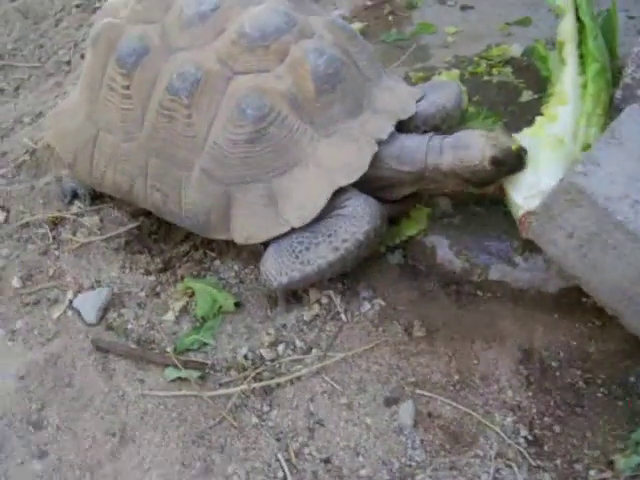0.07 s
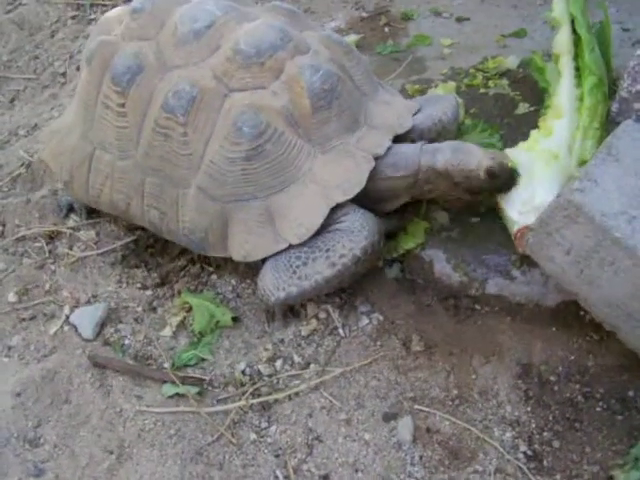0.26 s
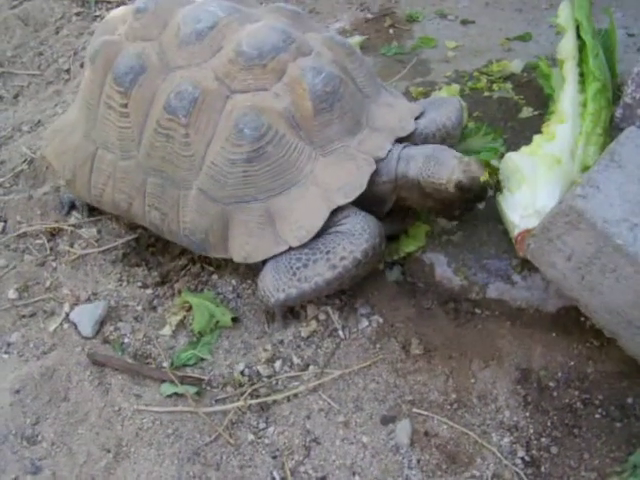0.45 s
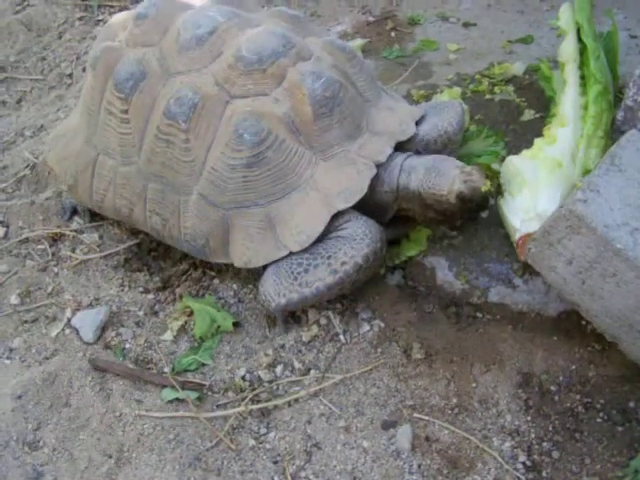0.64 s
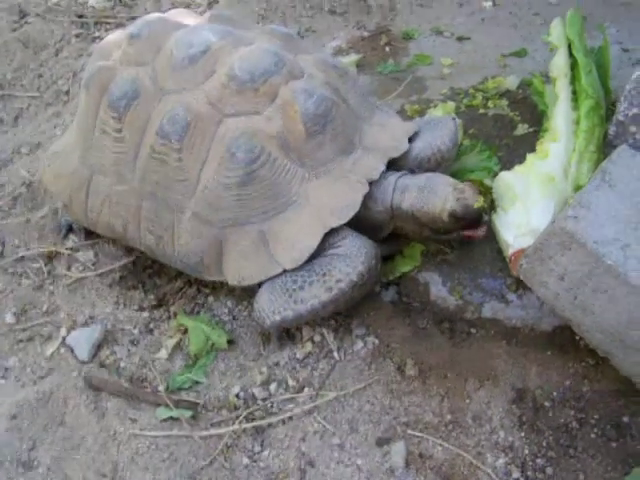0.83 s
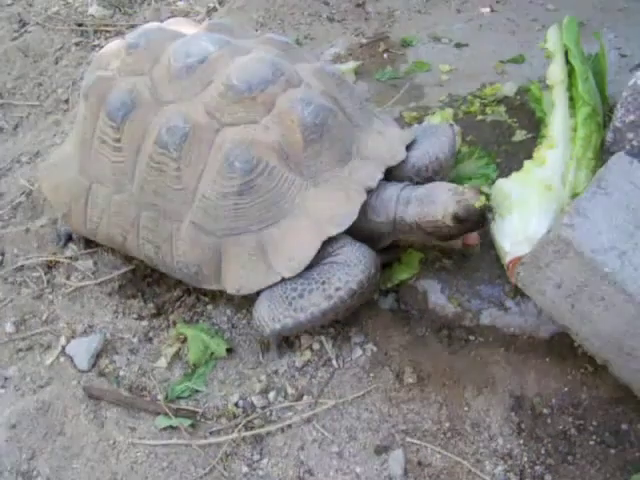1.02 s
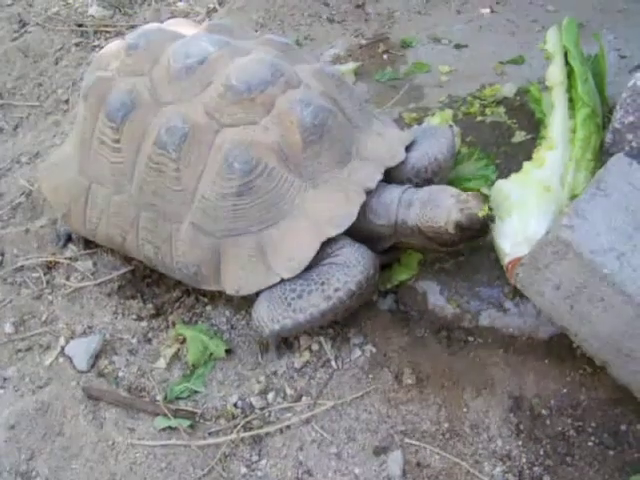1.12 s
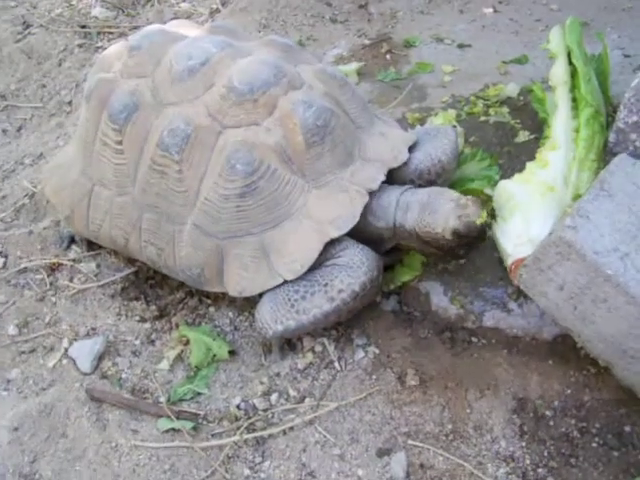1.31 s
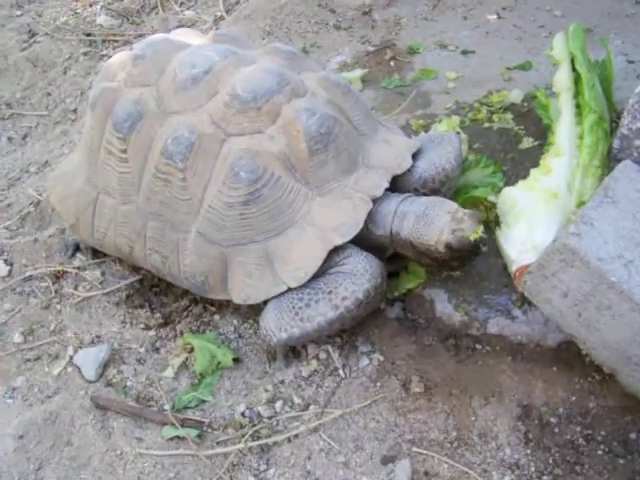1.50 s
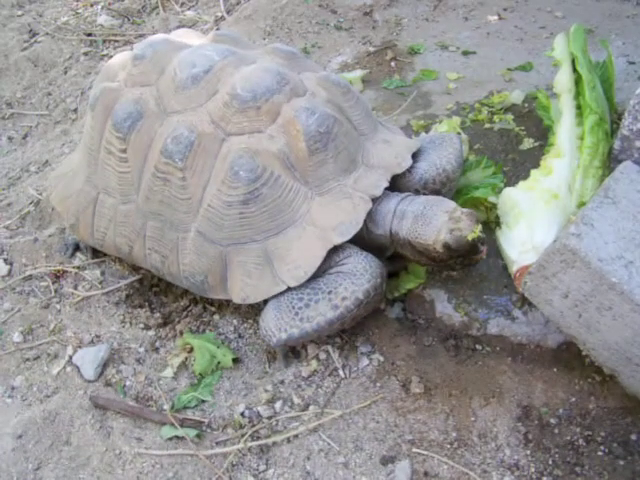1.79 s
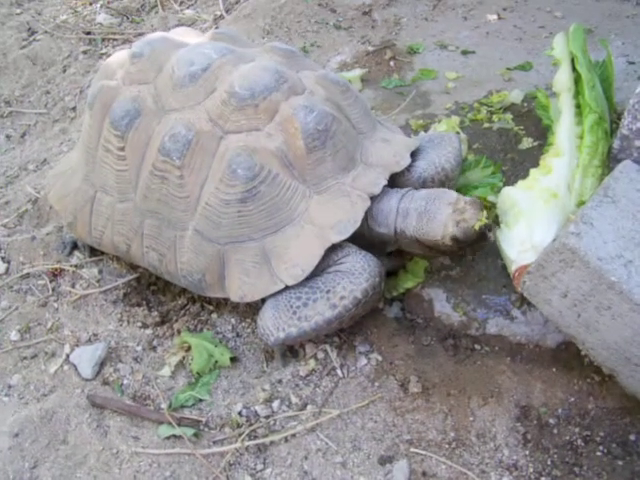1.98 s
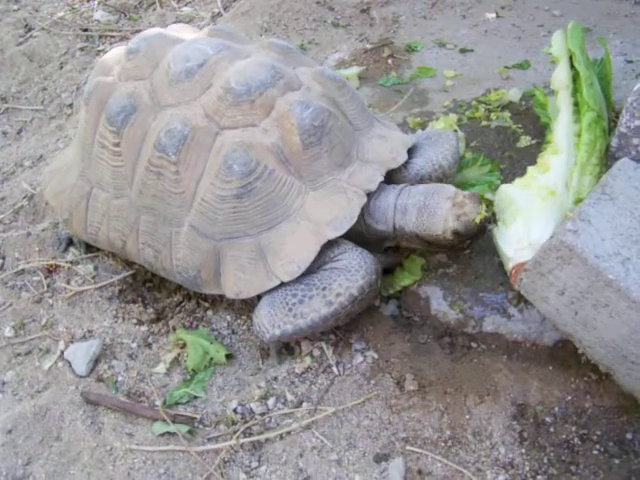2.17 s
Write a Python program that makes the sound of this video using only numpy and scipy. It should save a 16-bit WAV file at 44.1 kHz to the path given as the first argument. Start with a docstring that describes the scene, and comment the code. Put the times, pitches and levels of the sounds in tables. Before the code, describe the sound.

A tortoise bites crisply into lettuce close by, then chews softly while a bird chirps.

```python
"""A low rumble, soft hiss and faint hum open in a quiet yard, under a blur of distant birds.
Close by, a tortoise tears a bite from a head of lettuce: leaf ribs snap one by one as noise bursts
in a leaf-coloured filter, over a crackle of random cell bursts. A near bird chirps three times with
two gliding voices at once; short gliding sines are distant birds and, from about 1.88 s, likely
echoes of the near chirp. Soft chewing follows the bite, as wet ticks and ringing pops of the mouth."""
import sys
import numpy as np
from scipy import signal
from scipy.fft import rfft, irfft
from scipy.io import wavfile
from scipy.ndimage import uniform_filter1d

SR = 44100
rng = np.random.default_rng(int(sys.argv[2]) if len(sys.argv) > 2 else 0)


def wav_record(signal):
    """Record a signal, one row per channel, as 16-bit PCM in the file named by sys.argv[1]."""
    frames = np.transpose(np.atleast_2d(signal))
    bounded = np.clip(frames, -1, 1)
    # unit amplitude maps onto the largest positive 16-bit level
    quanta = np.round(bounded * 32767).astype(np.int16)
    wavfile.write(sys.argv[1], SR, quanta)


N = 96799
T = np.arange(N) / SR


def amp(db):
    """Decibels to gain."""
    return 10 ** (np.asarray(db) / 20)


def unit(x):
    """Scales to rms 1."""
    return x / np.sqrt(np.mean(x ** 2) + 1e-20)


def read(points, hz):
    """A spectrum's dB at given frequencies, interpolated along log frequency."""
    point_hz, db = np.transpose(points)
    return np.interp(np.log(hz + 1), np.log(point_hz), db)


def add(mix, start_s, sound):
    """Mixes a sound in at a time."""
    part = mix[max(round(start_s * SR), 0):][:len(sound)]
    part += sound[:len(part)]


def drift(hz, size):
    """Smooth random motion with a soft upper rate, scaled to rms 1 over the whole scene."""
    f = np.fft.rfftfreq(N, 1 / SR)
    smooth = irfft(rfft(rng.standard_normal(N)) * np.exp(-(f / hz) ** 2), N)
    return unit(smooth)[:size]


def patchy(points, patch_db):
    """Noise of a given colour that swells in small patches of time and pitch; rms 1."""
    hz, _, z = signal.stft(rng.standard_normal(N), SR, nperseg=2048, noverlap=1536)
    patches = uniform_filter1d(rng.standard_normal(z.shape), size=16, axis=0)  # across pitch
    patches = unit(uniform_filter1d(patches, size=6, axis=1))  # across time
    z = z * amp(read(points, hz)[:, None] + patch_db * patches)
    return unit(signal.istft(z, nperseg=2048, noverlap=1536)[1][:N])


# open air around the yard, colour before overall scaling: (frequency [Hz], level [dB])
AIR_COLOUR = [(20, -8.5), (60, -0.5), (87, -11), (115, -1), (150, -11), (216, -11), (280, -19.5),
              (560, -21), (900, -19), (1720, -21.5), (2450, -27.5), (3300, -19.5), (4400, -26), (5400, -35),
              (7900, -38), (8800, -55.5)]
AIR_DB, AIR_PATCH_DB = -45, 0.83
# blur of distant birds, colour before overall scaling: (frequency [Hz], level [dB])
CHORUS_COLOUR = [(2400, -39), (2800, -3), (3500, 0.5), (4500, -3), (5300, -25.5), (7000, -59.5)]
CHORUS_DB, CHORUS_PATCH_DB = -57, 9
# faint hum: (mean frequency [Hz], rms level [dB])
HUM_TONES = [(59.5, -54), (118, -54)]
HUM_WAVER, HUM_WAVER_HZ = 0.027, 9.1  # rms fraction of pitch, soft upper rate
HUM_SWELL, HUM_SWELL_HZ = 0.31, 1.3  # rms fraction of loudness, soft upper rate


def background():
    """Coloured noise makes rumble, hiss and distant birds; sines of drifting pitch make the hum."""
    hum = np.zeros(N)
    for hz, db in HUM_TONES:
        swell = 1 + HUM_SWELL * drift(HUM_SWELL_HZ, N)
        cycles = hz * np.cumsum(1 + HUM_WAVER * drift(HUM_WAVER_HZ, N)) / SR
        hum += amp(db) * unit(swell * np.sin(2 * np.pi * cycles))
    air = amp(AIR_DB) * patchy(AIR_COLOUR, AIR_PATCH_DB)
    chorus = amp(CHORUS_DB) * patchy(CHORUS_COLOUR, CHORUS_PATCH_DB)
    return air + chorus + hum


PEAK_OCTAVES, PEAK_DB = 0.7, 8.5  # bump around a break's brightest pitch: width, height


def ring(points, centre_hz=None, size=1024):
    """Minimum-phase response of energy 1 with a given colour, lifted near an optional pitch."""
    hz = np.fft.rfftfreq(size, 1 / SR)
    db = read(points, hz)
    if centre_hz:
        octaves = np.log2((hz + 1) / centre_hz)
        db = db + PEAK_DB * np.exp(-(octaves / PEAK_OCTAVES * 2) ** 2)
    log_gain = np.log(amp(np.r_[db, db[-2:0:-1]]))
    # the Hilbert transform of the log gain gives the phase that puts the energy earliest
    h = np.fft.ifft(np.exp(np.conj(signal.hilbert(log_gain)))).real[:size // 2]
    return h / np.linalg.norm(h)


# colour of breaking leaf, shared by crackle and snaps: (frequency [Hz], level [dB])
LEAF_COLOUR = [(300, -32), (1000, -12), (2100, -9.5), (2950, 2.5), (3600, -4), (4200, 1.5), (4850, -5.5),
               (5450, -1), (6200, -9), (7600, -11.5), (9000, -28.5)]
# crackle at the mouth, following the force of the bite: (time [s], rms level [dB])
BITE_FORCE = [(.12, -54), (.16, -42.5), (.205, -34), (.25, -38), (.306, -37), (0.328, -29), (0.348, -42.5),
              (.386, -44.5), (.401, -32.5), (0.45, -38.5), (0.454, -60.5)]
CELLS_PER_S, CELL_HZ = 1300, 3900  # mean rate of bursts, pitch they are brightest near
CELL_SPREAD_DB, CELL_LARGEST_DB = 7, 9  # mean of the random sizes before the cap, cap


def crackle():
    """Tiny cells burst at random while the beak presses, each exciting the leaf."""
    size_db = np.minimum(CELL_SPREAD_DB * rng.exponential(1, N), CELL_LARGEST_DB)
    sizes = amp(size_db) * rng.choice([-1, 1], N)
    bursts = sizes * (rng.random(N) < CELLS_PER_S / SR)
    cells = signal.fftconvolve(bursts, ring(LEAF_COLOUR, CELL_HZ))[:N]
    time_s, db = np.transpose(BITE_FORCE)
    return unit(cells) * amp(np.interp(T, time_s, db, right=-120))


SPLINTER = 0.2  # splinter strength relative to the first break


def fracture(body, decay_s, size=700):
    """One break and its quickly dying splinters, heard through a body; energy 1."""
    burst = SPLINTER * rng.standard_normal(size) * np.exp(-np.arange(size) / SR / decay_s)
    burst[0] = 1
    sound = np.convolve(burst, body)
    return sound / np.linalg.norm(sound)


# colour of the beak's thud: (frequency [Hz], level [dB])
BEAK_COLOUR = [(150, -29.5), (380, -14.5), (560, -3.5), (850, 2.5), (1150, 0.5), (1700, -17), (2500, -22),
               (5000, -45)]
CRACK_GAIN_DB, CRACK_DECAY_S = 8.5, 0.0015
THUD_GAIN_DB, THUD_DECAY_S = 9.5, 0.0017
# leaf ribs snapping close by; levels are before the crack and thud gains above:
# (time [s], level [dB], brightest pitch [Hz], thud of the beak [dB re that level])
RIB_SNAPS = [(.1388, -20, 4660, -23), (.1417, -22, 3040, -22), (.149, -28, 5600, -11),
             (.1615, -32.5, 4180, -18), (.1725, -19.5, 5400, -27.5), (.1775, -23.5, 6500, -20),
             (.1877, -22.5, 4800, -19.5), (.1948, -16, 3800, -27.5), (.2021, -23, 5800, -23.5),
             (.205, -11, 4810, -20.5), (.209, -13.5, 3120, -25), (.2135, -17.5, 4030, -25.5),
             (.222, -19.5, 4774, -22.5), (.2273, -21.5, 4815, -32), (.2308, -21.5, 3920, -32.5),
             (.238, -23, 4460, -22), (.243, -20, 3780, -23), (.2575, -8.5, 4190, -24),
             (.2868, -13.5, 5300, -22), (.3075, -22.5, 5480, -24.5), (.3202, -24.5, 4035, -19),
             (.3268, -18, 4600, -21), (.3283, -17, 4420, -17.5), (.3352, -17.5, 4600, -26),
             (.3427, -23.5, 5880, -15.5), (.3556, -21, 4026, -22), (.3647, -23, 5020, -28),
             (.373, -24, 3800, -27), (.39, -17, 5400, -19), (.3937, -14, 4650, -19.5),
             (.3968, -13, 4400, -16), (.4062, -10, 4250, -10), (.4139, -13.5, 4300, -23),
             (.4205, -10.5, 5100, -18.5), (.4273, -18, 5000, -14), (.4318, -23, 4980, -15.5),
             (.4359, -21.5, 5500, -23), (.451, -15, 3000, -20.5)]
# small wet ticks of chewing, close by, same gains:
# (time [s], level [dB], brightest pitch [Hz], thud of the beak [dB re that level])
CHEWING_TICKS = [(.5394, -38, 5490, -18.5), (.6938, -26.5, 4900, -8.5), (.9318, -34, 4490, -10),
                 (.98, -33.5, 4530, -20), (1.033, -34.5, 5000, -23), (1.0578, -38, 4970, -21),
                 (1.0795, -31, 5030, -21), (1.2448, -36, 4510, -5), (1.6858, -38.5, 5530, -17),
                 (1.9768, -32, 6500, -23.5)]


def snaps(rows):
    """Each break is a bright crack of the leaf with a duller thud of the beak."""
    out = np.zeros(N)
    beak = ring(BEAK_COLOUR)
    for time_s, db, hz, thud_db in rows:
        crack = fracture(ring(LEAF_COLOUR, hz), CRACK_DECAY_S)
        thud = fracture(beak, THUD_DECAY_S)
        add(out, time_s, amp(db + CRACK_GAIN_DB) * crack)
        add(out, time_s, amp(db + thud_db + THUD_GAIN_DB) * thud)
    return out


# near bird; fading counts in time before stretching:
# (time [s], level [dB], pitch factor [1], length factor [1], fading [dB per s])
NEAR_CHIRPS = [(.262, -19.5, 1.025, 1.1, 46.5), (.772, -17.5, 1.011, 0.96, 30),
               (1.817, -20.5, .995, 1.0, 29)]
# its lower voice, before a chirp's pitch, length and level:
# (time from the chirp [s], frequency [Hz], level [dB])
LOWER_VOICE = [(-.07, 2600, -44), (-.052, 2540, -36), (-.028, 2490, -30), (-.016, 2600, -31.5),
               (-.009, 2850, -16.5), (-.003, 3250, -10), (.003, 3490, -2.5), (.011, 3680, -15),
               (.017, 3630, -15.5), (.021, 3570, -2.5), (.027, 3520, 0), (.036, 3620, -7.5),
               (.052, 3540, -8), (.068, 3520, -17.5)]
# its upper voice, likewise: (time from the chirp [s], frequency [Hz], level [dB])
UPPER_VOICE = [(-.07, 3030, -40.5), (-.052, 2930, -29.5), (-.029, 2810, -25), (-.016, 3050, -23),
               (-.005, 3500, -15), (.002, 3960, -12.5), (.015, 4110, -9.5), (.028, 3990, -10.5),
               (.045, 3950, -21), (.068, 3930, -46)]
WAVER, WAVER_HZ = 0.005, 250  # rms fraction of pitch, soft upper rate
RASP_LEAD_IN, RASP, RASP_HZ = 0.3, 0.08, 1000  # roughness before and in the chirp, soft upper rate
# the beak lets the octave out only around this low pitch
OVERTONE_DB, OVERTONE_HZ, OVERTONE_FALL_DB_PER_HZ = 5.5, 2495, 0.062


def chirps():
    """Two whistles sweep up together from a hoarse lead-in and beat against each other."""
    out = np.zeros(N)
    for time_s, db, pitch, stretch, fade_db in NEAR_CHIRPS:
        for voice in LOWER_VOICE, UPPER_VOICE:
            at, voice_hz, level = np.transpose(voice)
            t = np.arange(at[0], at[-1], 1 / SR / stretch)  # time before stretching
            size = len(t)
            glide = uniform_filter1d(np.interp(t, at, voice_hz), size=150)
            hz = pitch * glide * (1 + WAVER * drift(WAVER_HZ, size))
            rasp = np.interp(t, [at[0] / 2, 0], [RASP_LEAD_IN, RASP])
            phase = 2 * np.pi * np.cumsum(hz) / SR + rasp * drift(RASP_HZ, size)
            octave = amp(OVERTONE_DB - OVERTONE_FALL_DB_PER_HZ * abs(hz - OVERTONE_HZ))
            tone = np.sin(phase) + octave * np.sin(2 * phase)
            tone = tone * (1 + rasp * drift(RASP_HZ, size))
            loudness = amp(db + np.interp(t, at, level) - fade_db * np.maximum(t, 0))
            ramps = signal.windows.tukey(size, 0.1)
            add(out, time_s + at[0] * stretch, loudness * ramps * tone)
    return out


# short glides: distant birds, and from about 1.88 s likely echoes of the near chirp;
# level is rms before the ramps:
# (start [s], length [s], first pitch [Hz], last pitch [Hz], level [dB], roughness [0-1])
GLIDE_NOTES = [(0.467, .075, 4650, 4450, -54, 0.3), (.535, .05, 4150, 3810, -48.5, 1),
               (.572, 0.045, 3420, 3230, -48, .7), (1.16, 0.036, 4300, 4150, -50, 0.42),
               (1.18, 0.063, 3800, 3880, -50, 0.35), (1.195, 0.05, 3480, 3410, -45.5, 0.24),
               (1.235, 0.064, 4000, 3610, -52.5, 0.92), (1.387, 0.11, 4510, 4450, -56, 0.38),
               (1.464, 0.056, 3616, 3360, -44.5, 0.28), (1.501, 0.025, 3520, 3760, -42.5, 0.24),
               (1.517, 0.024, 3460, 3300, -45, 0), (1.564, 0.057, 4150, 3630, -49.5, .8),
               (1.603, 0.056, 3300, 2895, -47.5, 0.68), (1.734, .05, 4530, 4080, -54, 1),
               (1.876, 0.088, 4540, 4485, -52, .4), (1.88, 0.1004, 4030, 3830, -47.5, 0.76),
               (1.902, .025, 3274, 3385, -38.5, 0.2), (1.917, 0.038, 3490, 3494, -41, 0.02),
               (1.96, 0.013, 3480, 3410, -37.5, .1), (1.98, 0.038, 3452, 3392, -40.5, 0.16),
               (1.99, .014, 3336, 3185, -39, 0.12), (2.097, 0.036, 3440, 3400, -50, 0)]
FLUTTER, FLUTTER_HZ = 0.085, 700  # rms fraction of pitch at roughness 1, soft upper rate
GLIDE_RAMP = 0.4  # share of a glide spent in its two ramps


def short_glides():
    """Short gliding sines, some pure and some buzzing with a fast random flutter of pitch."""
    out = np.zeros(N)
    for start_s, length_s, first_hz, last_hz, db, rough in GLIDE_NOTES:
        size = int(length_s * SR)
        glide = np.linspace(first_hz, last_hz, size)
        hz = glide * (1 + rough * FLUTTER * drift(FLUTTER_HZ, size))
        tone = np.sqrt(2) * np.sin(2 * np.pi * np.cumsum(hz) / SR)
        add(out, start_s, amp(db) * signal.windows.tukey(size, GLIDE_RAMP) * tone)
    return out


# moist pops of the mouth, close by: (time [s], level [dB], pitch factor [1])
MOUTH_POPS = [(0.9331, -46.5, 0.91), (0.9795, -42.5, 0.88), (2.0318, -45, 1.29), (2.0345, -34.5, 1.02)]
# what the mouth rings with, before a pop's pitch and level:
# (frequency [Hz], level [dB], 60 dB decay time [s])
MOUTH_MODES = [(971, 2, 0.022), (1820, 5, 0.024), (2242, 4, 0.016)]
POP_RISE_S = 0.00083


def pops():
    """The moist mouth rings briefly in a few decaying modes as it parts."""
    out = np.zeros(N)
    t = T[:SR // 20]
    for time_s, db, pitch in MOUTH_POPS:
        modes = np.zeros(len(t))
        for hz, level, t60 in MOUTH_MODES:
            modes += amp(level - 60 * t / t60) * np.sin(2 * np.pi * hz * pitch * t)
        add(out, time_s, amp(db) * np.minimum(t / POP_RISE_S, 1) * modes)
    return out


# echoes of the yard: walls nearby, then a thin tail (level re the early echoes)
ECHO_FIRST_S, ECHO_T60_S, TAIL_T60_S, TAIL_DB = 0.0046, 0.11, 0.71, 0
ECHOES_PER_S = 2000
EATING_WET_DB, CHIRP_WET_DB, GLIDE_WET_DB = -15.5, -11.5, -7.5  # echo energy re the direct sound


def yard(x, wet_db):
    """Adds sparse random reflections: quickly dying early echoes and a thin, longer tail."""
    t = T[:SR // 2]
    present = (rng.random(len(t)) < ECHOES_PER_S / SR) * (t > ECHO_FIRST_S)
    taps = rng.standard_normal(len(t)) * present
    early = unit(taps * amp(-60 * t / ECHO_T60_S))
    tail = unit(taps * amp(-60 * t / TAIL_T60_S))
    echo = early + amp(TAIL_DB) * tail
    return x + amp(wet_db) * signal.fftconvolve(x, echo / np.linalg.norm(echo))[:N]


def scene():
    """The tortoise and one bird close by, short glides around the yard, the open air behind."""
    eating = crackle() + snaps(RIB_SNAPS) + snaps(CHEWING_TICKS) + pops()
    near_bird = yard(chirps(), CHIRP_WET_DB)
    glides = yard(short_glides(), GLIDE_WET_DB)
    mix = background() + yard(eating, EATING_WET_DB) + near_bird + glides
    return mix[None]


EDGE_HZ = 8650


def record(dry):
    """A small camera's microphone has a narrow band: a steep low-pass removes the top treble."""
    band = signal.firwin(161, EDGE_HZ, window=("kaiser", 8), fs=SR)
    return signal.oaconvolve(dry, band[None], "same")


dry = scene()
out = record(dry)
wav_record(out)
```